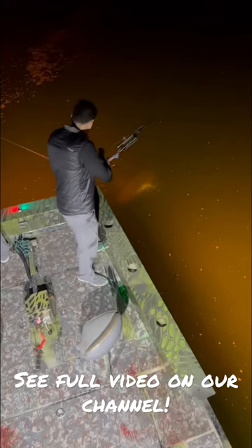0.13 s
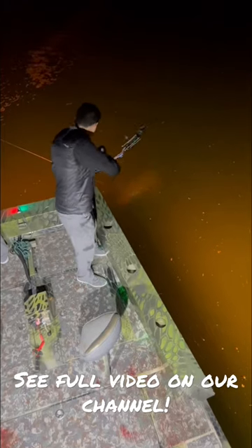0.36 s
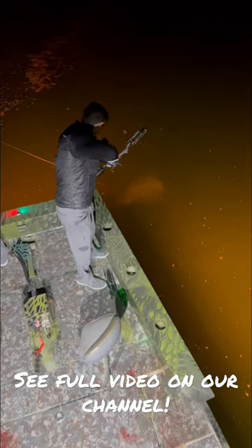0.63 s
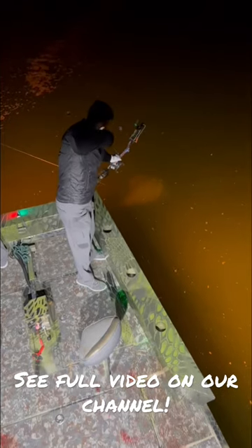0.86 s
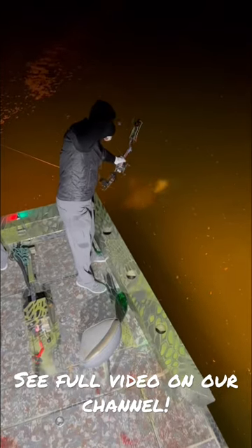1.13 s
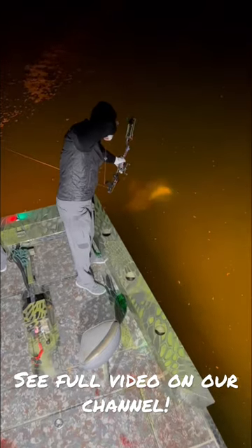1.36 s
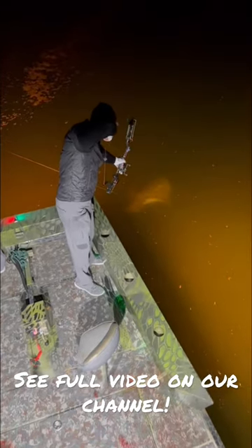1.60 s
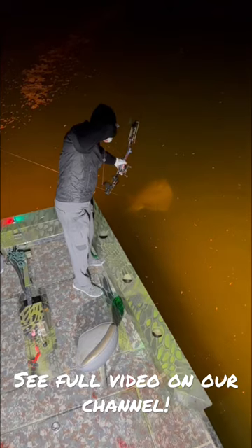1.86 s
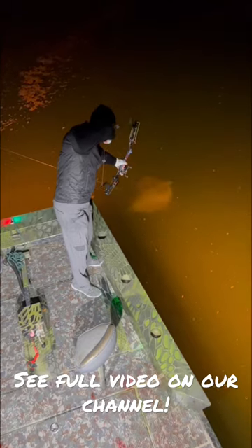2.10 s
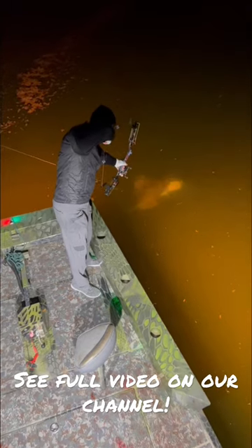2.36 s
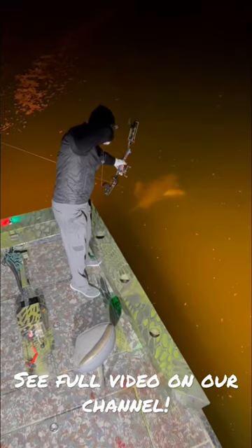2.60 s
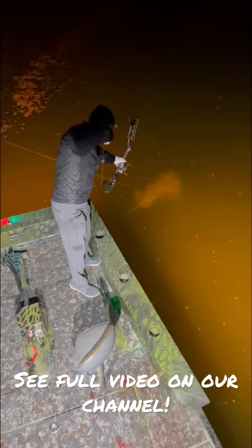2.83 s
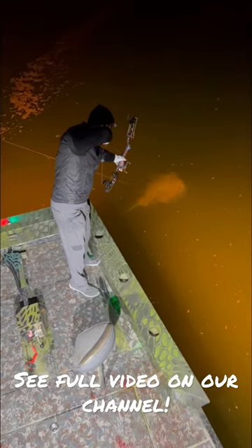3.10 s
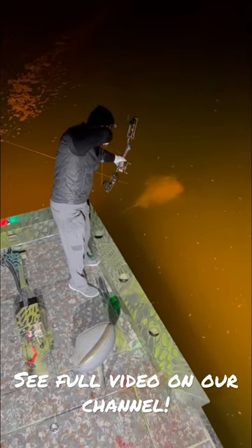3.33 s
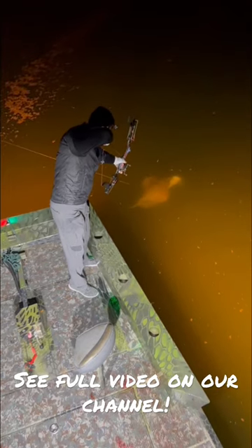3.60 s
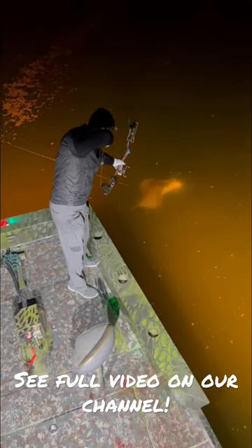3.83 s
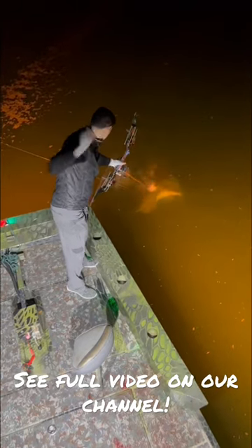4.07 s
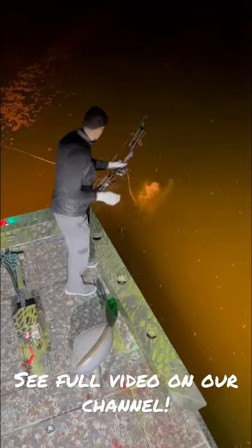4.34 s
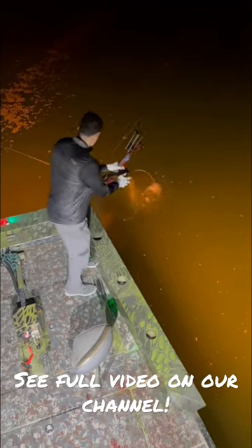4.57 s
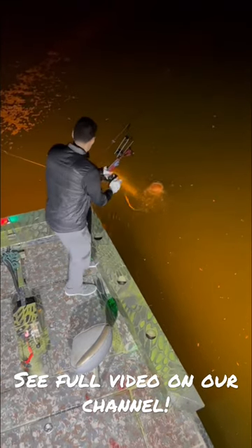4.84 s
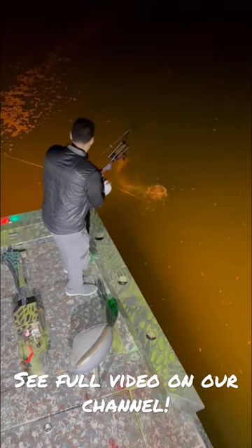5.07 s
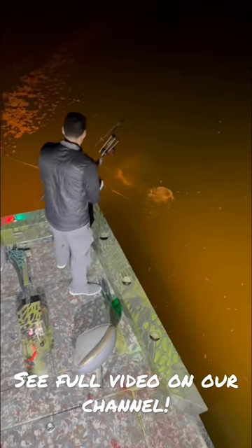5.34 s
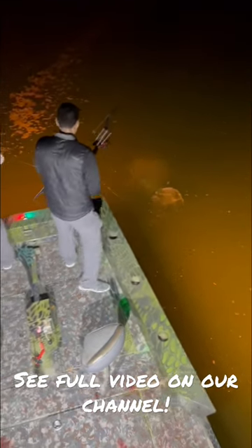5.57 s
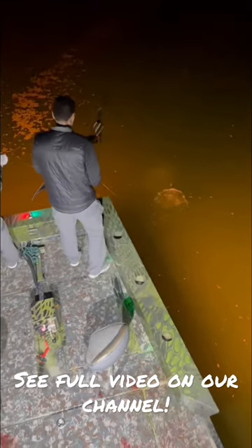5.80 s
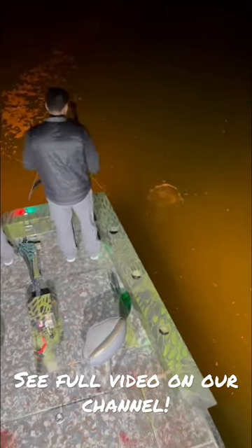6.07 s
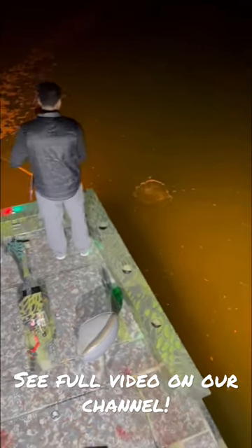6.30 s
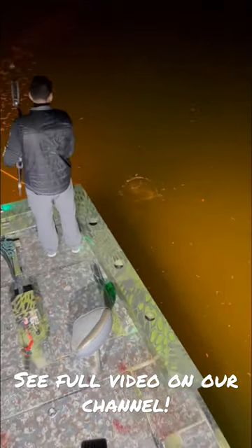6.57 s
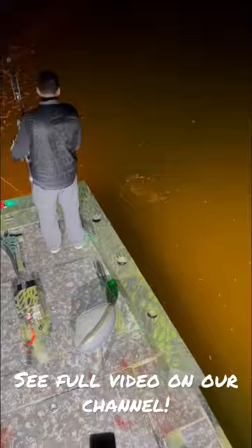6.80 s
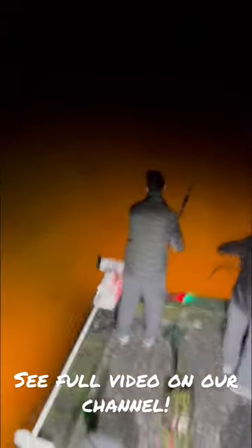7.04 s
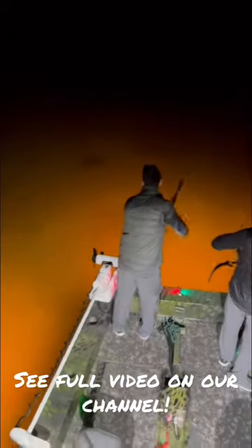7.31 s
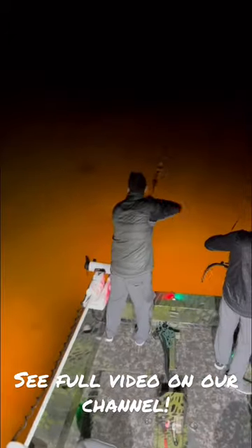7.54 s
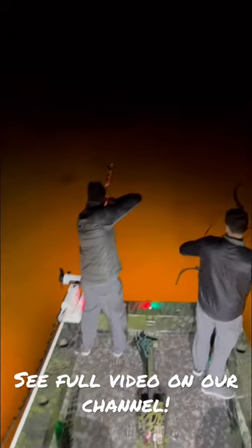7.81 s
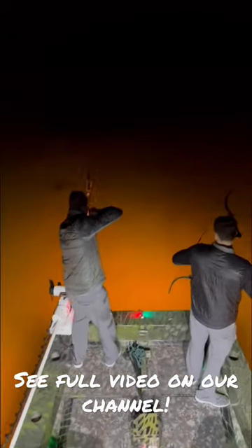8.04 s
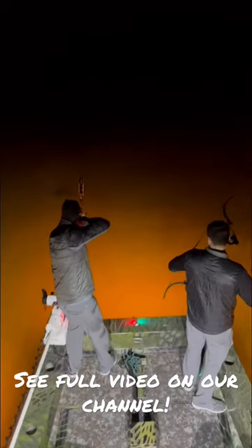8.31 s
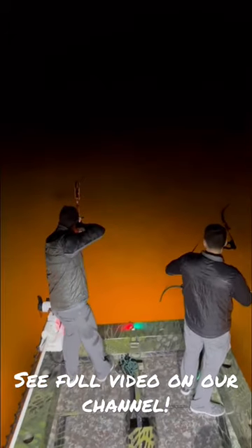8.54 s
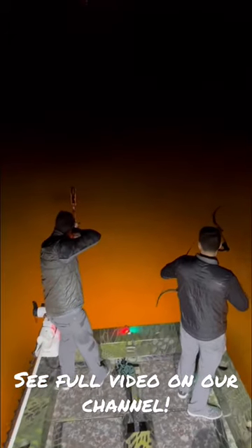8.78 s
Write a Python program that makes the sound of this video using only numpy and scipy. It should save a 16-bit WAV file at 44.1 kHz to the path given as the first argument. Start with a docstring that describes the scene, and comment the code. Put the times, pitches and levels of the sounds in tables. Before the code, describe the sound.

On a small open boat, an engine idles steadily in rapid low puffs with a faint airy hiss, joined by a deep hum that pulses a few times a second. Small clicks and knocks come near four and five seconds. Just before seven it drops out for an instant, then returns a little faster, with a soft low surge, handling noises and one heavy thump. Close stereo microphone, dry outdoor sound.

```python
"""Deck of a small boat at night, stereo microphone close by: the engine idles as a row of puffs with hiss.
Two other machines hum close notes that beat, in the first passage only.
After a fade through silence the engine runs a little faster, heard from another spot, with a low surge.
Gear in the hands ticks, scrapes and rustles and things knock on the deck: rung modes and bursts of grains."""
import sys
import numpy as np
from scipy import signal
from scipy.fft import rfft, irfft
from scipy.io import wavfile
from scipy.ndimage import uniform_filter1d

SR = 44100
rng = np.random.default_rng(int(sys.argv[2]) if len(sys.argv) > 2 else 0)


def convert_level_to_amplitude(level_db):
    """Map a level in decibels to its linear amplitude factor."""
    exponent = np.asarray(level_db, float) / 20
    return 10 ** exponent


def store_wav(level_fs):
    """Save 16-bit WAV to argv[1]."""
    pcm = np.round(np.clip(np.atleast_2d(level_fs), -1, 1) * 32767)
    wavfile.write(sys.argv[1], SR, pcm.T.astype(np.int16))


N = 392931
T = np.arange(N) / SR

# engine speed, the first point being a firing: t/s, firing rate/Hz
SLOW_SPEED = [(0.022, 19.116), (0.367, 18.914), (1.257, 19.288), (1.373, 18.731), (1.813, 19.754),
              (2.405, 19.11), (3.456, 19.236), (3.578, 18.526), (4.297, 19.321), (4.845, 18.827),
              (4.919, 19.141), (6.03, 19.06), (6.149, 19.23), (6.77, 18.874)]
FAST_SPEED = [(6.97, 23.106), (7.603, 23.418), (8.001, 22.759), (8.157, 23.141), (8.781, 23.369)]
# exhaust note before its fade: multiple of the firing rate, rms level/dB
SLOW_ORDERS = [(2, -52), (3, -32.5), (4, -35.5), (5, -34.5), (6, -27), (7, -23), (8, -30), (9, -30),
               (10, -25), (11, -37.5), (12, -43), (13, -40), (14, -48.5), (15, -58.5), (16, -54.5),
               (17, -56), (18, -54.5), (19, -57.5), (20, -48), (21, -51), (22, -59.5), (23, -61), (24, -49),
               (25, -76), (26, -68)]
FAST_ORDERS = [(2, -37), (3, -28.5), (4, -32), (5, -35), (6, -24.5), (7, -25), (8, -39), (9, -29.5),
               (10, -37.5), (11, -56), (12, -45), (13, -49.5), (14, -56), (15, -50.5), (16, -51),
               (17, -59.5), (18, -65), (19, -54.5), (20, -57.5), (21, -57.5), (22, -52.5), (23, -57.5),
               (24, -49.5), (25, -49.5), (26, -61.5), (27, -66.5)]
# where the puff starts: lag/cycles, phase/rad
SLOW_START = (0.145, -0.1)
FAST_START = (.113, -.7)
# colour of the turbulence riding each puff: f/Hz, relative density/dB
SLOW_CHUFF = [(30, -26.5), (50, -6.5), (130, 1.5), (220, -13.5), (300, -11), (420, -13.5), (550, -18),
              (800, -28.5), (1100, -44), (3000, -110)]
FAST_CHUFF = [(30, -24), (50, -13), (130, -0.5), (220, -5.5), (300, -22.5), (450, -11), (600, -19.5),
              (850, -21.5), (1100, -40.5), (3000, -110)]
# turbulence before its fade, slow and fast passage: rms level/dB
CHUFF_DB = (-32, -29.5)
# colour of the fan and valve hiss: f/Hz, relative density/dB
SLOW_HISS = [(350, -22.5), (600, -10.5), (830, 5), (1190, -1.5), (1400, -5.5), (1550, -0.5), (2100, -5.5),
             (2800, -1), (3400, -12.5), (4050, -16.5), (4750, -14), (5400, -22.5), (6300, -24.5),
             (7500, -29.5), (8500, -44), (11000, -71.5), (16000, -76)]
FAST_HISS = [(350, -17), (600, 0), (1040, 0), (1450, 0), (2470, -3.5), (3300, -10.5), (4700, -14),
             (5400, -22.5), (6300, -26.5), (7500, -31), (8500, -41), (11000, -68.5), (16000, -58)]
# hiss before its fade, slow and fast passage: rms level/dB
HISS_DB = (-44, -47.5)
# rings in the hiss, before each passage's own trim: f/Hz, width/Hz, level/dB
COWL = [(2245, 30, -3), (3710, 120, -11), (4350, 170, -6.5), (5850, 400, -27)]
# fades of the two passages: t/s, exhaust level/dB, hiss level/dB
SLOW_FADE = [(0, -1, -3), (6.85, -0.5, -2.5), (6.869, -1.5, -8), (6.88, -8.5, -14), (6.891, -35.5, -19),
             (6.898, -61, -75)]
FAST_FADE = [(6.89, -62.5, -55), (6.905, -24.5, -7), (6.931, -13, -1.5), (7.0, -9.5, -4), (7.098, -6, 0.5),
             (7.252, -3.5, -2.5), (8.4, -2.5, -1.5), (8.91, -4.5, -1)]
# left minus right at the microphone: f/Hz, level/dB
SLOW_BALANCE = [(60, 1.5), (150, -2.5), (250, -1.5), (400, -5), (640, 0), (1030, -4), (1650, 1),
                (2650, -1.5), (4260, 2.5), (9000, -0.5)]
FAST_BALANCE = [(60, -4), (150, -1), (250, -6), (400, -8), (640, -8), (1030, -1), (1650, 0.5), (2650, -0.5),
                (4260, 1.5), (9000, -0.5)]
# likeness of the left and right noise: f/Hz, correlation
LIKENESS = [(60, .97), (250, .9), (450, .6), (1000, .75), (2300, .7), (4300, .75), (9000, .85)]
# lateness of the left port in the treble, slow and fast passage: lag/s
LEFT_LAG_S = (.00051, 0)
# ticks of hard gear: t/s, peak level/dB, left minus right/dB, centre f/Hz, spread/octaves
TICKS = [(2.0795, -33.5, 7.5, 4400, .3), (2.0945, -34.5, 1, 2350, .8), (3.918, -32, 3.5, 3830, .3),
         (3.9271, -38, 10, 3040, 1.7), (3.9714, -39, 0, 3000, 1.5), (4.4623, -36, -4, 4900, 0.18),
         (5.236, -34, -1.5, 2236, 0.77), (5.2474, -23.5, 4.5, 4180, 0.21), (5.2588, -37.5, 4, 4400, 0.3),
         (7.0713, -23, 3, 2507, 1.3), (7.174, -40, -3, 6040, 1), (7.222, -40, -1.5, 3180, 0.89),
         (7.276, -37, 3, 2800, 1), (7.3155, -30, 3, 2760, 1.1), (8.036, -38, 0, 4250, 0.62),
         (8.073, -30, 4, 4480, 1), (8.078, -23, -2, 3030, 0.51), (8.084, -42.5, -1, 2210, 1.2),
         (8.108, -29, -1, 3200, 1.3)]
# modes of the gear, before a small random detuning: f/Hz, level/dB, 60 dB decay/s
GEAR = [(1880, 8.5, 0.019), (2330, -5.5, 0.014), (3160, -9, 0.008), (3900, 0.5, 0.012), (4310, 1.5, 0.015),
        (4530, -8, 0.017), (6150, -7, 0.009), (7670, -15, 0.0074), (9000, -44.5, 0.0028)]
# knocks on the deck: t/s, peak level/dB, left minus right/dB, centre f/Hz, spread/octaves
KNOCKS = [(3.934, -28, 8, 910, 1), (3.9945, -22.5, 3.5, 1290, 0.83), (4.008, -32.5, 1.5, 1296, 0.57),
          (4.014, -23, 6.5, 625, .6), (4.7155, -26.5, -0.5, 1147, 0.28), (5.124, -29.5, 6, 1460, 0.27),
          (6.379, -28, 7.5, 1240, 0.43), (6.991, -29, 0, 957, 0.45), (7.032, -35, 5.5, 450, 0.3),
          (7.071, -19, 2, 700, 1.1), (7.158, -29.5, 5, 450, 1.1), (7.26, -22, 7, 597, 0.78),
          (7.525, -30, 8, 542, 0.48), (7.6255, -30, 0.5, 2680, 0.48), (7.627, -13, 0.5, 380, 0.38),
          (8.078, -36.5, 0.5, 1710, 0.97)]
# modes of the deck, before a small random detuning: f/Hz, level/dB, 60 dB decay/s
DECK = [(290, 0, .03), (430, 0, .025), (620, -2, .018), (860, -1, .018), (1060, 0, .02), (1450, -1, .025),
        (2000, -7, .01), (3000, -13, .006)]
# scrapes and cloth rustles: start t/s, length/s, level at mid-length/dB, tilt/dB per octave
RUBS = [(3.925, .04, -38, -1.5), (3.953, .042, -38.5, -1.5), (3.99, .031, -39, -2), (6.964, .025, -46, -3),
        (7.044, .018, -49, 0), (7.072, .022, -37, -2.5), (7.217, .028, -41, -2), (7.268, .026, -46, -2),
        (7.308, .024, -38, -4.5), (7.395, .04, -47.5, -2.5), (8.074, .03, -39.5, -3.5),
        (8.107, .03, -42, -2)]
# colour of the rubs before their tilt: f/Hz, relative level/dB
RUB_COLOUR = [(400, -12), (800, 0), (1300, -5), (1600, 0), (1970, -11), (2220, 1), (2630, -7.5),
              (3100, -2.5), (4400, -9.5), (6500, -20.5), (9000, -30.5), (12500, -66), (15000, -47.5),
              (16000, -59)]
# faint handling at random times: from t/s, to t/s, number of rustles, mean level/dB
FIDGETING = [(6.92, 7.45, 5, -51), (7.75, 8.4, 5, -54)]
# steady notes of the two machines, before the fade: f/Hz, rms level/dB, phase/rad
HUMS = [(76.04, -27, .56), (78.84, -29, -.87)]
# low surge after the silence, before a fixed lift: t/s, level/dB
SURGE = [(6.89, -84), (6.95, -42), (7.0, -41), (7.1, -34), (7.25, -36), (7.35, -35.5), (7.45, -48),
         (7.6, -32.5), (7.8, -85)]


def passage(speed, orders, start, chuff, chuff_db, hiss, hiss_db, balance, fade, extra, lag_s, ring_db):
    """The engine at one speed: exhaust note, turbulence gated by each puff, steady hiss."""
    turns = crank(speed)
    s, low_db, high_db = np.transpose(fade)
    low, high = convert_level_to_amplitude(np.interp(T, s, low_db)), convert_level_to_amplitude(np.interp(T, s, high_db))
    note = low * (exhaust(turns, orders, start) + extra)
    turbulence = low * convert_level_to_amplitude(chuff_db) * puff_gate(turns, start[0]) * noise(chuff)
    rings = np.add(COWL, [0, 0, ring_db])
    steady_hiss = high * convert_level_to_amplitude(hiss_db + 0.51 * slow(3.1)) * noise(hiss, rings)
    heard_note = ports(note, 0 * note, balance, [(1, .97)], lag_s)
    return heard_note + ports(*(turbulence + steady_hiss), balance, LIKENESS, lag_s)


def crank(speed):
    """Firings so far at every sample, from the first speed point; the crank runs a little early or late."""
    turns = np.cumsum(np.interp(T, *np.transpose(speed))) / SR
    wobble = .007 * slow(8)  # rms in cycles, drifting at up to 8 Hz
    return turns - turns[round(speed[0][0] * SR)] + wobble


def exhaust(turns, orders, start, waver_db=1.21):
    """One sharp puff a cycle: the orders take the phase of a causal ring, and each wavers in level."""
    k, db = np.transpose(orders)
    lag, turn_rad = start
    grid = np.arange(1024) / 4  # quarter orders
    log_gain = np.log(convert_level_to_amplitude(np.interp(grid, np.r_[0, k, 60], np.r_[-75, db, -80])))
    # minimum phase, from the log gain mirrored into a full circle
    causal = -signal.hilbert(np.r_[log_gain, log_gain[-1], log_gain[:0:-1]]).imag
    phase = np.interp(k, grid, causal[:1024]) + turn_rad
    note = 0
    for order, level_db, rad in zip(k, db, phase):
        level = np.sqrt(2) * convert_level_to_amplitude(level_db + waver_db * slow(6))
        note = note + level * np.cos(2 * np.pi * order * (turns - lag) + rad)
    return note


def puff_gate(turns, lag):
    """Turbulence leaps up just ahead of each puff and dies away over the cycle, never to nothing."""
    age = (turns - lag + .02) % 1  # cycles
    return evened(signal.oaconvolve(.6 + np.exp(-age / .16), np.hanning(160), "same"))


def hits(events, modes, contact_s):
    """Each blow is a brief rough contact that rings the same modes, most of all those near its centre."""
    out, t = np.zeros((2, N + 4000)), np.arange(4000) / SR
    hz, db, t60 = np.transpose(modes)[:, :, None]
    for s, peak_db, pan_db, centre_hz, octaves in events:
        detune = rng.uniform(0.97, 1.03, hz.shape)
        favour_db = -6 * (np.log2(hz / centre_hz) / octaves) ** 2
        decay = convert_level_to_amplitude(db + favour_db - 60 * t / t60)
        ring = (decay * np.sin(2 * np.pi * hz * detune * t)).sum(0)
        ring = ring * np.minimum(t * centre_hz, 1)  # builds up over one cycle
        # partly common to both sides
        contact = .5 * rng.standard_normal((2, 600)) + rng.standard_normal(600)
        contact = contact * np.exp(-t[:600] / contact_s)
        contact[:, 0] += 6  # the first touch is the sharpest
        ring = signal.fftconvolve(contact, ring[None])[:, :4000]
        level = convert_level_to_amplitude(peak_db + np.c_[[pan_db, -pan_db]] / 2)
        out[:, round(s * SR):][:, :4000] += level * ring / abs(ring).max()
    return out[:, :N]


def rubs():
    """Scrapes and rustles: bursts of dense uneven grains, each dying away over its length."""
    out = np.zeros((2, N))
    for s, length, db, tilt_db in RUBS + rustles():
        n = round(length * SR)
        hz = np.fft.rfftfreq(n, 1 / SR)
        unevenness = evened(uniform_filter1d(rng.standard_normal(n), size=70))
        grains = rng.standard_normal((2, n)) * convert_level_to_amplitude(3.5 * unevenness)
        grains[1] += 1.3 * grains[0]  # the sides are partly alike
        colour_db = read(RUB_COLOUR, hz) + tilt_db * np.log2((hz + 1) / 2000)
        burst = irfft(rfft(grains) * convert_level_to_amplitude(colour_db), n)
        burst = np.array([evened(side) for side in burst])
        dying = convert_level_to_amplitude(db - 9 * (np.arange(n) / n - .5))  # 9 dB down from start to end
        out[:, round(s * SR):][:, :n] += dying * burst * signal.windows.tukey(n, .2)
    return out


def rustles():
    """Faint rustles scattered by chance, as rows like those of the rubs; the longer are the louder."""
    rows = []
    for start, end, count, mean_db in FIDGETING:
        when, size = rng.random((round(count), 2)).T
        for w, z in zip(when, size):
            rows.append((start + (end - start) * w, .025 * (.5 + z), mean_db + 2 * (2 * z - 1), 0))
    return rows


def hum():
    """Two other machines hum close notes that beat, each drifting slightly in level and phase."""
    total = 0
    for hz, db, rad in HUMS:
        level = np.sqrt(2) * convert_level_to_amplitude(db + .5 * slow(2))
        total = total + level * np.cos(2 * np.pi * hz * T + rad + .15 * slow(1))
    return total


def rumble():
    """Lumpy low noise that surges after the silence, alike on both sides."""
    level_db = np.interp(T, *np.transpose(SURGE), left=-90, right=-90)
    colour = [(25, -31), (45, -13.5), (80, -14), (110, -24.0), (300, -63.0), (1000, -120)]  # f/Hz, density/dB
    return convert_level_to_amplitude(level_db + 7.0) * noise(colour)[0]


def noise(spectrum, rings=(), patchy_db=1.0):
    """Two unrelated noises of one colour, with patches of level that drift in time and pitch."""
    hz = np.fft.rfftfreq(1024, 1 / SR)
    a, b, c, d, patches = rng.standard_normal((N // 256 + 5, 513, 5)).T
    patches = uniform_filter1d(uniform_filter1d(patches, size=10, axis=0), size=14, axis=1)
    gain = convert_level_to_amplitude(read(spectrum, hz)) * (hz > spectrum[0][0] / 2)
    for f, width, db in rings:
        gain = gain + convert_level_to_amplitude(db) / (1 + (2 * (hz - f) / width) ** 2)
    z = np.array([a + 1j * b, c + 1j * d]) * gain[:, None] * convert_level_to_amplitude(patchy_db * evened(patches))
    return evened(signal.istft(z, nperseg=1024, noverlap=768)[1][:, :N])


def ports(x, other, balance, likeness, lag_s):
    """Two microphone ports: partly alike, the left late by the lag (less so for bass), unevenly shaded."""
    hz = np.fft.rfftfreq(N, 1 / SR)
    same, side = read(likeness, hz), convert_level_to_amplitude(read(balance, hz) / 2)
    lag = lag_s * (1 - .55 / (1 + (hz / 550) ** 4))
    left = rfft(x) * side * np.exp(-2j * np.pi * hz * lag)
    right = (same * rfft(x) + np.sqrt(1 - same ** 2) * rfft(other)) / side
    return irfft(np.array([left, right]), N)


def slow(rate_hz):
    """A random drift of rms 1: sines from 0.2 Hz up to the rate, the slower the stronger."""
    hz, start = np.geomspace(.2, rate_hz, num=20), rng.random(20)
    coarse = T[::200]
    drift = (np.sin(2 * np.pi * (hz * coarse[:, None] + start)) / np.sqrt(hz)).sum(1)
    return np.interp(T, coarse, evened(drift))


def read(points, hz):
    """Reads a spectrum on a log-frequency axis."""
    f, value = np.transpose(points)
    return np.interp(np.log(hz + 1), np.log(f + 1), value)


def evened(x):
    """Scales to rms 1."""
    return x / np.sqrt(np.mean(x ** 2) + 1e-20)


def scene():
    """Two passages of the engine, each under its fade, and the small sounds on deck."""
    first = passage(SLOW_SPEED, SLOW_ORDERS, SLOW_START, SLOW_CHUFF, CHUFF_DB[0], SLOW_HISS, HISS_DB[0],
                    SLOW_BALANCE, SLOW_FADE, extra=hum(), lag_s=LEFT_LAG_S[0], ring_db=-4.8)
    second = passage(FAST_SPEED, FAST_ORDERS, FAST_START, FAST_CHUFF, CHUFF_DB[1], FAST_HISS, HISS_DB[1],
                     FAST_BALANCE, FAST_FADE, extra=0, lag_s=LEFT_LAG_S[1], ring_db=-7.5)
    ticks = hits(TICKS, GEAR, contact_s=0.00095)
    knocks = hits(KNOCKS, DECK, contact_s=.0009)
    return first + second + ticks + knocks + rubs() + rumble()


def top_cut(x):
    """Nothing passes above the cut-off."""
    return signal.sosfilt(signal.butter(12, 15750, fs=SR, output="sos"), x)


def record(dry):
    """The microphone cuts and delays bass; the converter mirrors a trace of it around a high carrier."""
    hz = np.fft.rfftfreq(N, 1 / SR)
    bass_cut = 1 / np.sqrt(1 + (36 / (hz + 1)) ** 12)
    bass_delay = np.exp(1j * 300 / np.maximum(hz, 25))  # turns one radian at 300 Hz, more below
    heard = irfft(rfft(dry) * bass_delay * bass_cut, N)
    mirrored = heard * (1 + convert_level_to_amplitude(-62) * np.cos(2 * np.pi * 9600 * T))
    return top_cut(mirrored)


dry = scene()
out = record(dry)
store_wav(out)
```